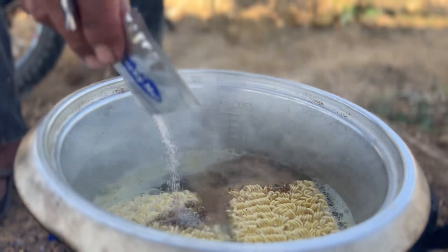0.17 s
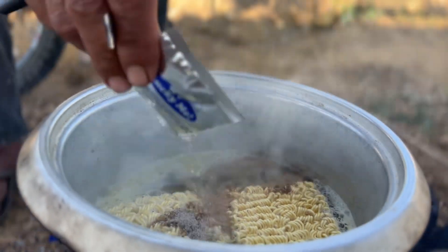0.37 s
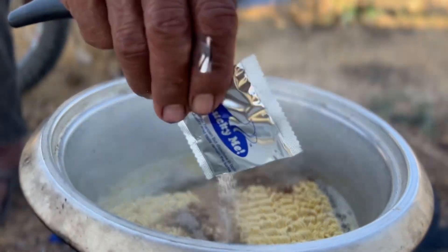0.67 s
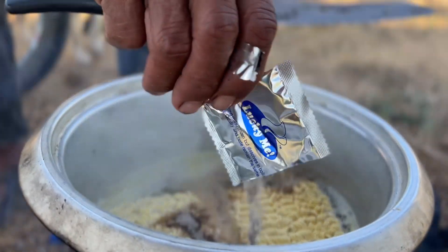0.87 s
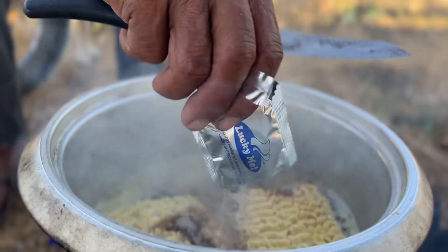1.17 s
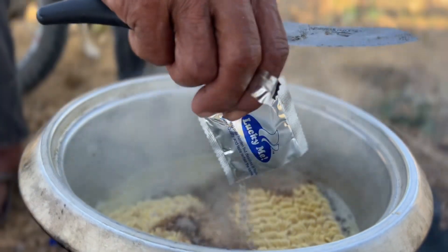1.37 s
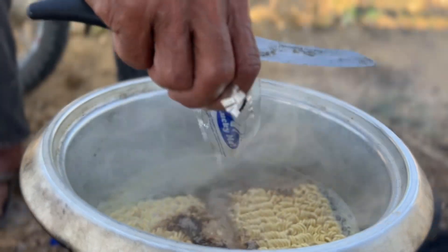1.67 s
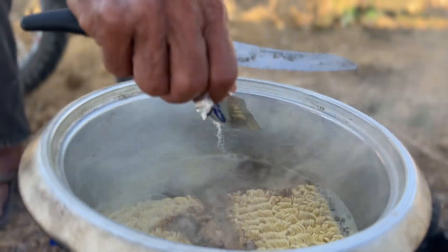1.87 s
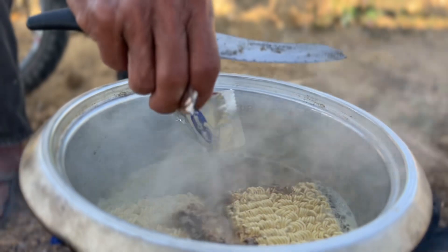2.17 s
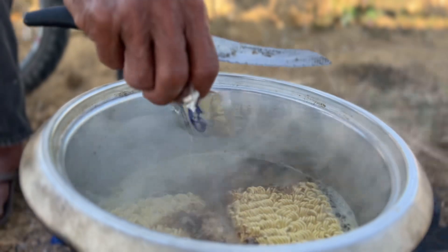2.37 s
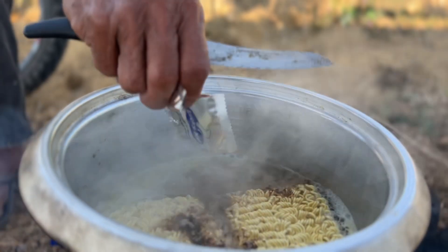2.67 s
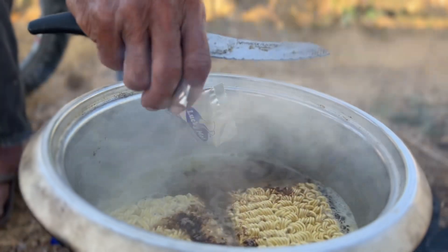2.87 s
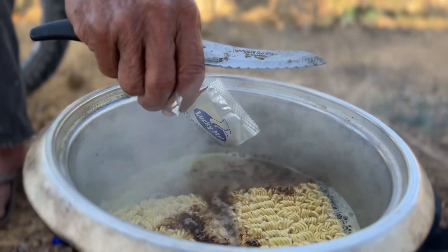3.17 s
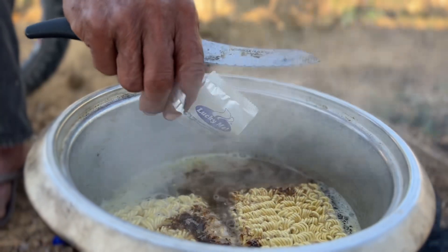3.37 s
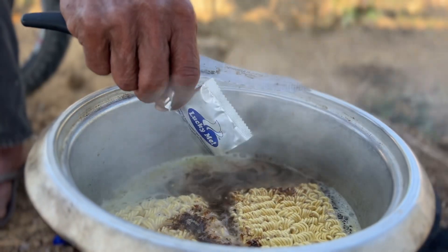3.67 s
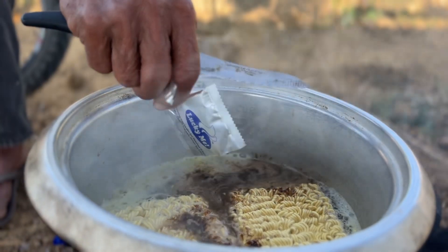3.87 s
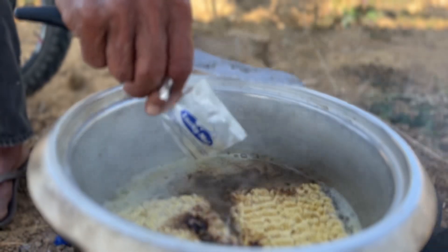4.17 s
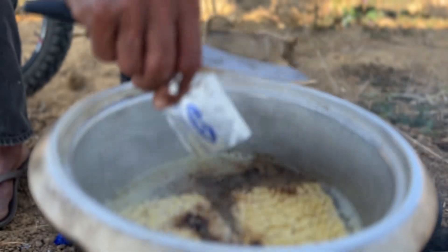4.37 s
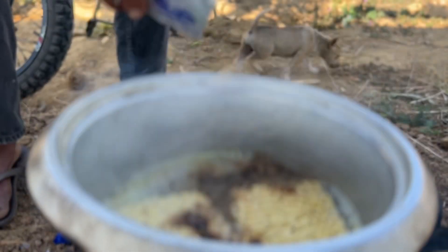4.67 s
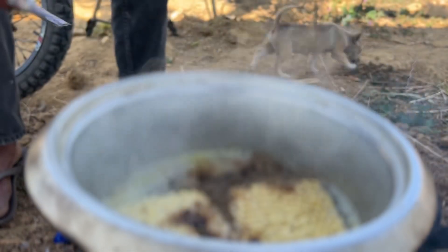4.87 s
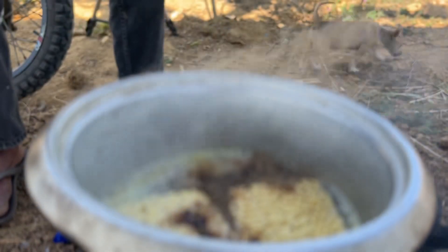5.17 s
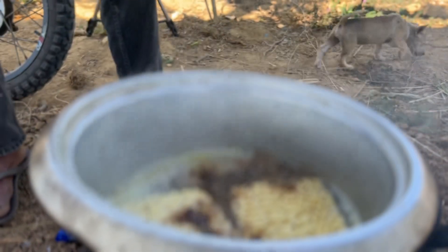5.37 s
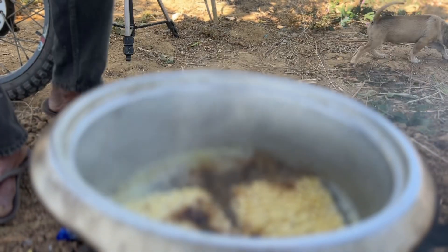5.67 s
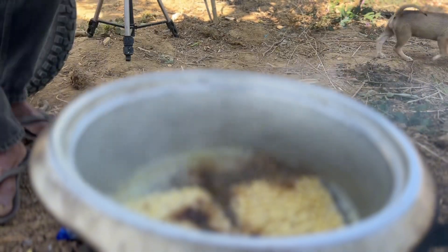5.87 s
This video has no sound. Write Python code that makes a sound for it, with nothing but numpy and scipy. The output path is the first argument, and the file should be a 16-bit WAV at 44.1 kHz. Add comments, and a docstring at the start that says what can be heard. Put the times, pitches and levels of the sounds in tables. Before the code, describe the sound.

Close to a simmering pot outdoors, dry seasoning hisses out of a foil sachet in quick shakes, with crisp, bright crinkles and snaps until the hand withdraws around three seconds. Soft bubbling and low wind rumble continue, with dull gusts on the microphone. A small bird then repeats a quick rising chirp, blurred by echoes, and a foot scuffs dry litter near the end.

```python
"""Powder hisses from a foil-plastic sachet rubbed over a simmering pot outdoors: grain noise in spurts.
Simmer and wind are coloured noise, with a faint grainy 5-7 kHz noise, perhaps an insect.
Creases snap as short noise bursts with ringing foil facets; the hand withdraws.
A small bird repeats a rising chirp, a swept sine blurred by dense echoes.
A foot shifts on dry litter: grain noise, cracks and damped thuds."""
import sys
import numpy as np
from scipy import signal
from scipy.fft import rfft, irfft, next_fast_len
from scipy.io import wavfile
from scipy.ndimage import uniform_filter1d

SR = 44100
rng = np.random.default_rng(int(sys.argv[2]) if len(sys.argv) > 2 else 0)


def pcm_store(signal):
    """Save signal as 16-bit PCM."""
    levels = np.round(np.clip(np.atleast_2d(signal), -1, 1) * 32767)
    wavfile.write(sys.argv[1], SR, levels.astype(np.int16).T)


N = 265614
TIME = np.arange(N) / SR

# Table levels are source levels, ahead of the gains and filters in the functions.
# hand at work: [t/s, sliding powder level/dB, rubbed film level/dB]
HAND = [(0.0, -55, -65.5), (0.34, -56, -69), (0.57, -57, -63.5), (0.94, -52.5, -57.5), (1.02, -59.5, -60),
        (1.15, -55, -61.5), (1.25, -61, -72), (1.43, -65.5, -75), (1.6, -67, -68), (1.69, -58, -65),
        (1.81, -59, -66), (2.02, -61, -72), (2.19, -55, -61), (2.49, -62, -70.5), (2.66, -64.5, -68),
        (2.98, -66, -84), (3.2, -74, -88)]
LET_GO_S, GONE_S = 2.9, 3.3  # fingers fade out between these
# powder spurts, one per shake: [peak t/s, length/s, level/dB]
SPURTS = [(.03, 0.25, -53), (.27, 0.091, -58), (.41, 0.19, -50), (.52, 0.15, -49.5), (.6, .09, -55),
          (.72, 0.11, -54), (1.38, 0.091, -65), (1.87, 0.25, -61.5), (2.21, .12, -57.5), (2.29, 0.1, -53),
          (2.97, 0.18, -63)]
# powder spectrum: [f/Hz, density/dB per Hz]
POUR_COLOUR = [(1500, -14), (2400, -11.5), (3700, -3), (4800, -7), (6300, 2), (7500, -3.5), (9300, -6),
               (10700, -3.5), (12000, 4), (14500, 0), (16000, -12)]
# rubbed film spectrum: [f/Hz, density/dB per Hz]
RUB_COLOUR = [(700, -33), (1200, -22), (1700, -13), (2300, -6.5), (2850, -4), (3600, 1), (4600, -12),
              (6500, -16), (9000, -15), (16000, -42)]
# left-right correlation, near sources: [f/Hz, correlation/-1..1]
NEAR_LIKENESS = [(100, 0.98), (1500, 1), (3000, 0.49), (7000, 0.86), (10000, 1), (16000, 1)]
# left-right correlation, open yard: [f/Hz, correlation/-1..1]
YARD_LIKENESS = [(50, 0.97), (200, 0.78), (600, 0.72), (1500, 0.2), (4000, 0.13), (16000, 0.83)]
# air resonances of the pot: [f/Hz, t60/s, level/dB]
POT_MODES = [(567, 0.056, -45), (1140, 0.04, -40.5), (1264, 0.037, -42), (3040, 0.061, -57)]
# simmer and pot hiss: [t/s, level/dB]
SIMMER_LEVEL = [(0.0, -64.5), (0.48, -64.5), (0.67, -63), (1.34, -65.5), (2.9, -64), (3.4, -66.5),
                (5.25, -65.5), (6.02, -61)]
# simmer spectrum: [f/Hz, density/dB per Hz]
SIMMER_COLOUR = [(60, -1.5), (130, 4.5), (250, -2), (400, -0.5), (560, 0), (800, -9), (1200, -5.5),
                 (1600, -12), (2400, -13.5), (5000, -14.5), (9500, -35), (16000, -37)]
# bursting bubbles: [t/s, f/Hz, peak level/dB, t60/s]
BUBBLE_BURSTS = [(1.002, 788, -41.5, 0.024), (1.0555, 730, -38.5, 0.038), (3.8011, 1220, -38, 0.017)]
RUMBLE_DB, RUMBLE_WAVER_DB = -60.7, 2.7
# rumble spectrum: [f/Hz, density/dB per Hz]
WIND_COLOUR = [(25, -44), (36, -8.5), (56, 0.5), (80, -6.5), (120, -12), (200, -22.5), (400, -38),
               (1000, -81)]
# gusts on the microphone: [peak t/s, length/s, level/dB]
GUSTS = [(0.36, 0.093, -54), (0.58, 0.092, -54), (1.49, 0.21, -53), (3.15, 0.24, -56), (3.33, 0.15, -44.5),
         (3.52, 0.33, -50), (3.685, .11, -38.5), (3.91, 0.19, -51), (4.2, 0.29, -50), (4.46, 0.098, -47),
         (4.59, 0.13, -46), (5.3, 0.11, -51), (5.42, 0.15, -47.5), (5.59, .1, -51), (5.76, 0.27, -51),
         (5.97, 0.14, -48.5)]
# gust spectrum: [f/Hz, density/dB per Hz]
GUST_COLOUR = [(22, -38), (36, -4.5), (52, 2.5), (80, -5.5), (130, -27.5), (300, -61)]
# snapping creases: [t/s, crack level/dB, brightness/dB per octave,
#                    facet f/Hz, facet peak level/dB, air puff peak level/dB]
SNAPS = [(0.7299, -48, 4.5, 12800, -23.5, -66), (0.731, -54, 0, 2630, -27.5, -66),
         (0.79, -57.5, -4.5, 1600, -44, -62), (0.8128, -48, -1.5, 2100, -36, -66),
         (0.8347, -36, -0.5, 3410, -18.5, -59), (0.8343, -42, 5, 12600, -19.5, -64),
         (0.835, -41, -2, 2700, -21.5, -64), (0.8353, -44, -1.5, 5800, -17.5, -66),
         (0.8378, -46, -2, 1910, -30, -59), (0.8422, -57, 5, 13000, -34, -60),
         (0.99, -48.5, -3.5, 1550, -34, -55), (1.0178, -49.5, -2.5, 3340, -33, -56),
         (1.026, -53, -5, 2900, -39, -56), (1.041, -55, -4, 3000, -42, -58),
         (1.0509, -40, -0.5, 6140, -28, -53), (1.0536, -48, -2, 1750, -33, -56),
         (1.059, -49.5, -3, 700, -40, -54), (1.1723, -47, -2, 3420, -30.5, -60),
         (1.3975, -63, 6, 7600, -49, -70), (1.514, -56.5, -4.5, 2100, -44, -68),
         (1.543, -61, -2, 3200, -47, -65), (1.6222, -55.5, -2.5, 1980, -40, -64),
         (1.641, -59, 1, 6300, -48, -68), (1.6544, -55, 0.5, 6540, -41, -66),
         (1.7835, -48.5, -4, 3770, -35, -55), (2.0235, -52, 1.5, 7500, -42, -58),
         (2.027, -43, 1.5, 11500, -28, -44), (2.0876, -51, 1.5, 7540, -36, -52),
         (2.127, -51, 4.5, 12500, -36, -62), (2.1304, -41, -.5, 2880, -29.5, -43.5),
         (2.318, -35, 2.3, 7300, -22, -41), (2.409, -61, -4, 1400, -47, -60),
         (2.5226, -47, 3, 7600, -32.5, -59), (2.5242, -50, 2, 6220, -27.5, -63),
         (2.568, -57, -1, 3020, -46, -62), (2.638, -42, 2.5, 3850, -29.5, -53.5),
         (2.673, -48.5, -2, 2885, -37.5, -50), (2.6855, -60, -2, 3200, -44, -62),
         (2.717, -55, 3, 12500, -43, -68), (2.726, -41.5, 2.5, 13070, -28, -46),
         (2.7593, -46, -0.5, 2930, -31, -52), (2.7673, -50.5, 4.5, 7500, -40, -60),
         (2.7913, -54, 2, 6500, -42, -60), (2.7948, -46.5, 0.5, 3300, -41, -54),
         (2.8012, -45.5, 2, 1150, -40, -47), (2.936, -58, -1, 3000, -46, -64),
         (2.954, -60, -3, 1200, -43, -52), (3.148, -47.5, 4.5, 7650, -31, -62),
         (3.4334, -68, 2, 13000, -49, -74), (3.5719, -63.5, 4.5, 13000, -47, -72),
         (3.6326, -63, 2, 7000, -50, -72), (3.6663, -64, 3, 12500, -48, -72)]
# crack radiation bands: [low f/Hz, high f/Hz, level/dB]
CRACK_BANDS = [(470, 1930, -8), (2430, 4540, .5), (5180, 7660, -0.5), (8360, 10900, -5),
               (11100, 14400, -0.6)]
TILT_PIVOT_HZ = 4400  # brightness tilt is 0 dB here
LEAD_IN_S, LEAD_IN_DB = .003, -15.5  # mean lead; level re main crack
SETTLE_S, SETTLE_DB, SETTLE_LOSS_DB = .007, -17.5, -2.5  # mean gap; first level; change per wrinkle
FACET_T60_S, FACET_LAG_S = 0.0077, .0003
PUFF_HZ, PUFF_T60_S = (540, 1163), 0.019
SMALL_SNAPS_PER_S, SMALL_SNAP_DB = 15, 1  # lesser creases; level re HAND film level
SNAP_PAN_DB = -1.5  # left minus right
# fingertips crushing the folded corner: [peak t/s, length/s, level/dB]
CRUSH = [(1.0, 0.1, -55.5), (1.055, 0.056, -52), (1.795, 0.094, -55.5), (2.14, 0.048, -55),
         (2.332, 0.047, -53), (2.75, 0.11, -56), (2.956, 0.042, -57), (1.53, .06, -62), (1.64, .06, -61)]
# crush spectrum: [f/Hz, density/dB per Hz]
CRUSH_COLOUR = [(300, -11), (700, -6), (1600, -10.5), (3000, -12), (5000, -4.5)]
# opening slurs of the bird: [t/s, length/s, from f/Hz, to f/Hz, level/dB]
OPENING_NOTES = [(3.352, .06, 4450, 5250, -66), (3.41, .036, 5600, 6200, -68),
                 (3.91, .036, 5550, 6100, -66.5), (3.946, .03, 6350, 6800, -65)]
# chirps: [top t/s, level/dB, pitch ratio to SWEEP, length ratio to SWEEP]
CHIRPS = [(4.125, -64.5, .97, 1.1), (4.257, -61, 1.02, 0.95), (4.386, -58.5, 1, 0.91),
          (4.522, -55, 1, 1.07), (4.655, -56.5, 1.01, 1.08), (4.786, -56, 1, 1.05),
          (4.912, -55.5, .99, 1.02), (5.04, -54, 1.01, 1), (5.169, -55, 1.01, 1.02), (5.3, -55, 1, 1),
          (5.429, -55, 1.04, 0.96), (5.565, -54.5, 1.01, 1.07), (5.695, -55.5, 1.05, 1.1),
          (5.828, -58, 1, 1.05)]
# shape of one chirp before its ratios and wobble: [t from top/s, f/Hz, level/dB]
SWEEP = [(-.074, 3600, -8), (-.060, 3850, -4), (-.044, 4580, -2), (-.033, 5420, -1.5), (-.024, 6340, -2.5),
         (-.016, 6560, -4), (-.007, 6680, 0), (0, 7020, -.5), (.006, 6600, -6)]
SWEEP_WOBBLE_HZ, SWEEP_WOBBLE_DB = 50, 1.3  # random spread per sweep point, before pitch ratio
NEAR_ECHO_T60_S, NEAR_ECHO_DB, BIRD_DIRECT_DB = .06, -.3, -3.7  # leaves and ground blur each sweep
# dry stalks and grit cracking underfoot: [t/s, level/dB, brightness/dB per octave]
TWIGS = [(4.2688, -60, -2), (4.7, -64, -5), (5.0095, -54, 3), (5.012, -61, 3), (5.455, -64, 2),
         (5.714, -51.5, -.5), (5.72, -60, -3), (5.882, -62, -8), (5.8907, -65.5, -9), (5.9595, -54, -5),
         (5.9708, -63.5, -10), (6.0105, -62, -4)]
# sandal dragging through litter: [peak t/s, length/s, level/dB]
SCUFFS = [(4.255, 0.071, -59), (4.69, .045, -61), (5.48, .32, -63.5), (5.68, .035, -60), (5.885, .05, -61),
          (5.975, .07, -58)]
# scuff spectrum: [f/Hz, density/dB per Hz]
SCUFF_COLOUR = [(700, -4), (1200, -6), (2200, -7), (3700, -2), (5500, -5), (8000, -16), (14000, -21)]
# footfalls and the yielding stalk: [t/s, f/Hz, peak level/dB, t60/s]
STEPS = [(5.729, 230, -41.5, 0.03), (5.7425, 85, -38, 0.06), (5.88, 800, -43, .016),
         (5.89, 400, -41, 0.024), (5.9592, 4110, -30, 0.014), (5.9594, 2020, -48, .014),
         (5.9605, 620, -38, .014), (5.9612, 262, -30, 0.011), (5.973, 90, -39, .05)]
FOOT_LAG_S = .00047  # right after left
# microphone port phase: [f/Hz, left lead/rad]
PORT_PHASE = [(50, 0), (400, .25), (1000, .85), (2000, .05), (2600, .6), (4100, 2.9), (5600, 3.6),
              (7300, 6.3), (8100, 5.8), (9200, 3.3), (10900, 3), (12500, .1), (15000, -.3), (16000, -2.5)]
# microphone port balance: [f/Hz, left minus right/dB]
PORT_BALANCE = [(60, -0.4), (110, -2), (200, -1), (380, 0.0), (700, -0.7), (1290, 2), (2380, 0),
                (4400, -3.5), (8120, 0), (15000, 0)]
# microphone response with treble notch: [f/Hz, gain/dB]
MIC_COLOUR = [(5700, 0), (8900, .5), (9600, -6.5), (10400, -7), (11000, -1), (12100, 0.5), (13500, 0.5),
              (15500, 0.5)]
CUTOFF_HZ = 16100


def from_db(db):
    """Amplitude ratio from dB."""
    return 10 ** (np.asarray(db) / 20)


def rms_one(x):
    """Scale to unit rms."""
    return x / np.sqrt(np.mean(x ** 2) + 1e-20)


def level(rows):
    """Gain at every sample from rows of (t/s, level/dB)."""
    return from_db(np.interp(TIME, *np.transpose(rows)))


def swells(rows):
    """Sum of cosine-squared gain pulses from rows of (peak t/s, length/s, level/dB)."""
    total = 0
    for s, length_s, db in rows:
        phase = np.pi * np.clip((TIME - s) / length_s, -.5, .5)
        total = total + from_db(db) * np.cos(phase) ** 2
    return total


def at_hz(points, hz):
    """Interpolate a table on a log-frequency axis."""
    table = np.array(points)
    return np.interp(np.log(hz + 1e-6), np.log(table[:, 0]), table[:, 1])


def band(x, low_hz, high_hz):
    """Butterworth band-pass."""
    sos = signal.butter(2, [low_hz, min(high_hz, .45 * SR)], "band", fs=SR, output="sos")
    return signal.sosfilt(sos, x + 1e-18)


def add(out, s, sound):
    """Mix a short sound in at time s."""
    i = max(int(s * SR), 0)
    room = max(N - i, 0)
    out[..., i:i + sound.shape[-1]] += sound[..., :room]


def drift(rate_hz):
    """Slow random curve of unit rms: low-passed noise made at SR / 40."""
    r = np.exp(-80 * np.pi * rate_hz / SR)
    noise = rng.standard_normal(N // 40 + 2002)
    slow = signal.lfilter([1], [1, -2 * r, r * r], noise)[2000:]  # drop the filter's start-up
    return np.interp(np.arange(N) / 40, np.arange(len(slow)), rms_one(slow))


def ring(x, hz, t60_s):
    """Damped resonator: a unit click rings a sine of initial height 1."""
    r = np.exp(-np.log(1000) / (t60_s * SR))
    w = 2 * np.pi * hz / SR
    return signal.lfilter([0, np.sin(w)], [1, -2 * r * np.cos(w), r * r], x + 1e-18)


def thuds(rows):
    """Damped resonances struck once each, rows of (t/s, f/Hz, peak level/dB, t60/s)."""
    out = np.zeros(N)
    for s, hz, db, t60_s in rows:
        add(out, s, from_db(db) * ring(signal.unit_impulse(SR // 10), hz, t60_s))
    return out


def grains(per_s, spread_db, smooth):
    """Tiny impacts of uneven size over a smooth noise bed; two mid-side pairs."""
    born = rng.random((2, 1, N)) < per_s / SR
    sizes = from_db(spread_db * np.minimum(rng.exponential(1, (2, 1, N)), 4))
    impacts = rms_one(born * sizes * rng.standard_normal((2, 2, N)))
    return impacts + smooth * rng.standard_normal((2, 2, N))


def coloured(drive, colour, likeness, flicker_db):
    """Third-octave stereo bands of the drive, each with its own level and flicker; unit rms."""
    out = 0
    edges_hz = 16500 / 2 ** (np.arange(30)[::-1] / 3)
    for k, (low, high) in enumerate(zip(edges_hz, edges_hz[1:])):
        if high < colour[0][0] or low > colour[-1][0]:
            continue
        hz = np.sqrt(low * high)
        mid, side = band(drive[k % 2], low, high)  # neighbours use different pairs
        alike = np.clip(at_hz(likeness, hz), -1, 1)
        gain = from_db(at_hz(colour, hz) + flicker_db * drift(9.2))
        stereo = np.sqrt(1 + alike) * mid + np.sqrt(1 - alike) * side * [[1], [-1]]
        out = out + gain * stereo
    return rms_one(out)


def from_left(x, lag_s):
    """Stereo pair whose right side arrives late."""
    return np.array([x, np.roll(x, round(lag_s * SR))])


def holding():
    """Gain that fades as the fingers let go."""
    return np.interp(TIME, [LET_GO_S, GONE_S], [1, 0])


def rub_level():
    """Gain of the film being rubbed."""
    return holding() * level(np.array(HAND)[:, [0, 2]])


def sliding_powder():
    """Many grain impacts; the flow swells in spurts and leaves in small clumps."""
    flow = np.hypot(holding() * level(np.array(HAND)[:, [0, 1]]), swells(SPURTS))
    flow = flow * from_db(1.3 * drift(40))  # clumps
    sliding = grains(per_s=4500, spread_db=2.6, smooth=.55)
    return from_db(3.0) * flow * coloured(sliding, POUR_COLOUR, NEAR_LIKENESS, flicker_db=1.4)


def rubbed_film():
    """Film under the fingers: sparser impacts of small wrinkles."""
    wrinkles = grains(per_s=900, spread_db=2.2, smooth=.5)
    return from_db(1.5) * rub_level() * coloured(wrinkles, RUB_COLOUR, NEAR_LIKENESS, flicker_db=3.0)


def pot_hiss():
    """The hot pot hisses faintly: noise with the powder's spectrum at the simmer's pace."""
    hiss = coloured(rng.standard_normal((2, 2, N)), POUR_COLOUR, NEAR_LIKENESS, flicker_db=1.3)
    return from_db(-0.5) * level(SIMMER_LEVEL) * hiss


def broth():
    """Soft simmer of bubble impacts and a few larger ringing bubbles."""
    bubbling = grains(per_s=900, spread_db=2, smooth=1.2)
    simmer = coloured(bubbling, SIMMER_COLOUR, YARD_LIKENESS, flicker_db=2.5)
    return from_db(6) * level(SIMMER_LEVEL) * simmer + thuds(BUBBLE_BURSTS)


def insect_noise():
    """A faint grainy 5-7 kHz noise, perhaps an insect: band-passed grain impacts."""
    rasp = grains(per_s=500, spread_db=1.5, smooth=.6)[0]
    return from_db(-73.5) * rms_one(band(rasp, 4960, 6800))


def turbulence(colour):
    """Low noise with its slow level evened out."""
    air = coloured(rng.standard_normal((2, 2, N)), colour, YARD_LIKENESS, flicker_db=-0.4)
    return air / np.sqrt(uniform_filter1d(np.mean(air ** 2, axis=0), size=3500))


def wind():
    """Wavering low rumble; gusts push deeper lumps of pressure on the microphone."""
    calm = from_db(RUMBLE_DB + RUMBLE_WAVER_DB * drift(7.7))
    rumble = calm * turbulence(WIND_COLOUR)
    return rumble + from_db(-0.5) * swells(GUSTS) * turbulence(GUST_COLOUR)


def cracks(rows, t60_s, body_t60_s, rise_s, tail_db, tail_t60_s, scatter_db):
    """Sudden buckles ring for milliseconds per band, longer in the low ones; reflections trail."""
    out = np.zeros((2, N))
    t = np.arange(int(.06 * SR)) / SR
    ring_times_s = np.geomspace(body_t60_s, t60_s, len(CRACK_BANDS))
    packed = np.sqrt(.004 / .06)  # refers the 60 ms rms to 4 ms
    onset = 1 - np.exp(-(t / rise_s) ** 2)  # the buckle runs along the crease
    tail_decay = np.exp(-np.log(1000) * t / tail_t60_s)
    for s, db, tilt in rows:
        for (low, high, band_db), ring_s in zip(CRACK_BANDS, ring_times_s):
            octaves = np.log2(np.sqrt(low * high) / TILT_PIVOT_HZ)
            noise = onset * rng.standard_normal((4, len(t)))
            direct = noise[0] + from_db(scatter_db) * noise[1] * [[1], [-1]]
            direct = direct * np.exp(-np.log(1000) * t / ring_s)
            tail = (noise[2] + noise[3] * [[.5], [-.5]]) * tail_decay
            snap = rms_one(band(direct, low, high))
            snap = snap + from_db(tail_db) * rms_one(band(tail, low, high))
            gain = from_db(db + band_db + tilt * octaves) * packed
            add(out, s - rise_s / 2, gain * snap)
    return out


def buckling(rows, count=3):
    """A random weak crack before each snap softens its start; ever weaker wrinkles follow unevenly."""
    rows = np.array(rows)
    gaps = rng.uniform(.5, 1.5, (len(rows), count + 1))
    lead_in = rows + [(-LEAD_IN_S * gap, LEAD_IN_DB, 0) for gap in gaps[:, 0]]
    delays_s = SETTLE_S * np.cumsum(gaps[:, 1:], axis=1)
    after = []
    for k in range(count):
        wrinkle_db = SETTLE_DB + SETTLE_LOSS_DB * k
        after.append(rows + [(delay, wrinkle_db, 0) for delay in delays_s[:, k]])
    return np.vstack([rows, lead_in, *after])


def scattered(per_s, start_s, end_s, spread_db, tilt_db):
    """Crack rows at random times, (t/s, level/dB, brightness/dB per octave)."""
    count = int(per_s * (end_s - start_s))
    low = [start_s, -spread_db, tilt_db - 2]
    high = [end_s, spread_db, tilt_db + 2]
    return rng.uniform(low, high, (count, 3))


def facets(rows):
    """Each snap flips a foil facet that rings and pushes a two-pitch puff of air into the pot."""
    foil = thuds([(s + FACET_LAG_S, hz, db, FACET_T60_S) for s, _, _, hz, db, _ in rows])
    puffs = thuds([(s, hz * rng.uniform(.94, 1.06), db, PUFF_T60_S)
                   for s, *_, db in rows for hz in PUFF_HZ])
    return foil + puffs


def snapping_creases():
    """Buckling foil: listed snaps with facets, plus lesser random cracks that follow the rubbing."""
    film = dict(t60_s=.005, body_t60_s=.014, rise_s=.0005,
                tail_db=-13, tail_t60_s=.04, scatter_db=-10)
    lesser_rows = scattered(SMALL_SNAPS_PER_S, SNAPS[0][0], GONE_S, spread_db=0.0, tilt_db=-2.0)
    lesser = from_db(SMALL_SNAP_DB) * rub_level() * cracks(lesser_rows, **film)
    main = cracks(buckling([row[:3] for row in SNAPS]), **film)
    pan = from_db(SNAP_PAN_DB * np.array([[.5], [-.5]]))
    return pan * (main + facets(SNAPS) + lesser)


def crushed_corner():
    """Fingertips crush the folded corner: sparse fold impacts in short swells."""
    folds = grains(per_s=450, spread_db=2, smooth=.25)
    return swells(CRUSH) * coloured(folds, CRUSH_COLOUR, NEAR_LIKENESS, flicker_db=2.0)


def sachet():
    """All sachet sounds, also exciting the air resonances of the pot."""
    direct = sliding_powder() + rubbed_film() + snapping_creases() + crushed_corner()
    hollow = sum(from_db(db) * ring(direct, hz, t60_s) for hz, t60_s, db in POT_MODES)
    return direct + hollow


def glide(hz, db):
    """One whistled note: a sine along a pitch curve."""
    tone = np.sin(2 * np.pi * np.cumsum(hz) / SR)
    return from_db(db) * signal.windows.tukey(len(hz), .2) * tone


def scatter(x, t60_s):
    """Dense dying echoes, different at each side, with unit mean energy."""
    t = np.arange(SR // 3) / SR
    echoes = rng.standard_normal((2, len(t))) * np.exp(-np.log(1000) * t / t60_s)
    return signal.fftconvolve(x[None], rms_one(echoes) / np.sqrt(len(t)), axes=1)[:, :N]


def bird(echo_t60_s=0.38, top_echo_db=-2, echo_db=-4.5):
    """Opening slurs, then S-shaped rising sweeps with a last flick; the yard blurs them, tops linger."""
    song = np.zeros(N)
    stage_s, stage_hz, swell_db = np.transpose(SWEEP)
    for s, length_s, from_hz, to_hz, db in OPENING_NOTES:
        add(song, s, glide(np.linspace(from_hz, to_hz, int(length_s * SR)), db))
    for s, db, pitch, stretch in CHIRPS:
        bend, swell = rng.standard_normal((2, len(SWEEP)))
        t = np.arange(stage_s[0], stage_s[-1], 1 / (stretch * SR))
        hz = pitch * np.interp(t, stage_s, stage_hz + SWEEP_WOBBLE_HZ * bend)
        note_db = db + np.interp(t, stage_s, swell_db + SWEEP_WOBBLE_DB * swell)
        add(song, s + stretch * stage_s[0], glide(hz, note_db))
    song = song * from_db(3.2 * drift(150) - .5)  # arrives broken and grainy
    direct = from_db(BIRD_DIRECT_DB) * from_left(song, .00017)
    near_echo = from_db(NEAR_ECHO_DB) * scatter(song, NEAR_ECHO_T60_S)
    echo = scatter(song, echo_t60_s)
    lingering = band(echo, 6450, 6900)
    yard = from_db(echo_db) * echo + from_db(top_echo_db) * lingering
    return from_db(-3.0) * (direct + near_echo + yard)


def foot():
    """A sandal drags and settles on dry litter: scuffed grit, cracking stalks, damped thuds."""
    twigs = cracks(buckling(TWIGS), t60_s=.008, body_t60_s=.014, rise_s=.0006,
                   tail_db=-12, tail_t60_s=.04, scatter_db=-9)
    grit = grains(per_s=700, spread_db=2.5, smooth=.4)
    scuffs = swells(SCUFFS) * coloured(grit, SCUFF_COLOUR, YARD_LIKENESS, flicker_db=2)
    return scuffs + from_left(twigs[0] + thuds(STEPS), FOOT_LAG_S)


def ports(near):
    """Two microphone ports: phase and level differ by frequency, over a shared response."""
    size = next_fast_len(N + SR // 10)
    hz = np.arange(size // 2 + 1) * SR / size
    sides = np.array([[.5], [-.5]])
    phase = np.exp(1j * sides * at_hz(PORT_PHASE, hz))
    gain = from_db(sides * at_hz(PORT_BALANCE, hz) + at_hz(MIC_COLOUR, hz))
    return irfft(rfft(near, size) * phase * gain, size)[:, :N]


def scene():
    """Sachet, pot, insect noise and wind through the ports; bird and foot added directly."""
    through_ports = sachet() + pot_hiss() + broth() + insect_noise() + wind()
    return ports(through_ports) + bird() + foot()


def record(dry):
    """Steep elliptic low-pass cuts the top."""
    sos = signal.ellip(10, .3, 70, CUTOFF_HZ, fs=SR, output="sos")
    return signal.sosfilt(sos, dry)


dry = scene()
out = record(dry)
pcm_store(out)
```